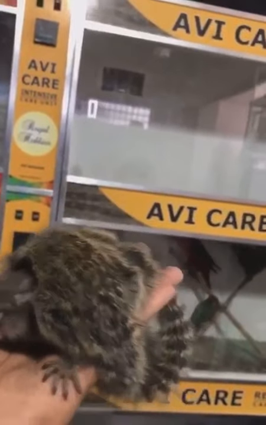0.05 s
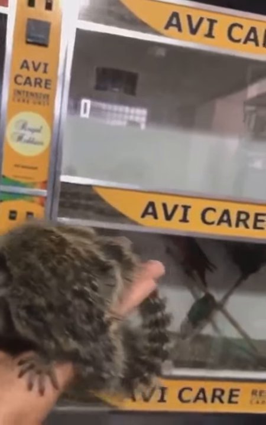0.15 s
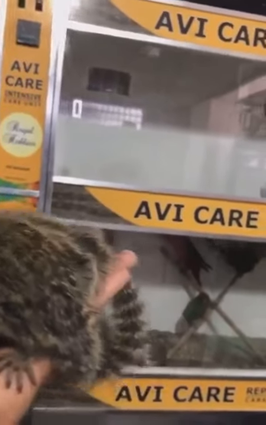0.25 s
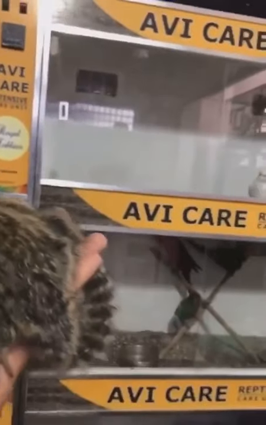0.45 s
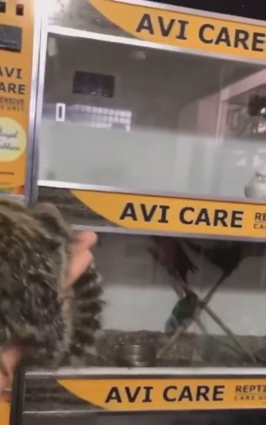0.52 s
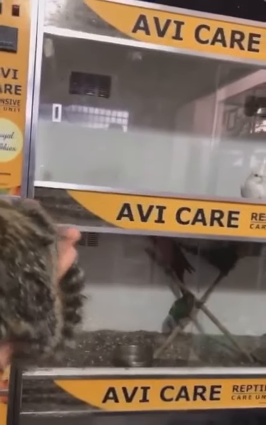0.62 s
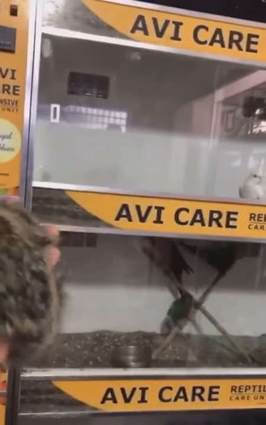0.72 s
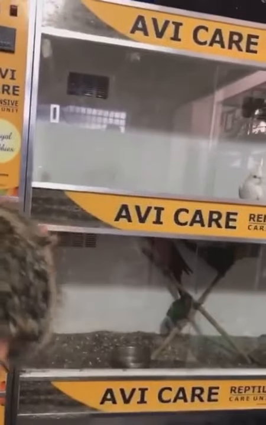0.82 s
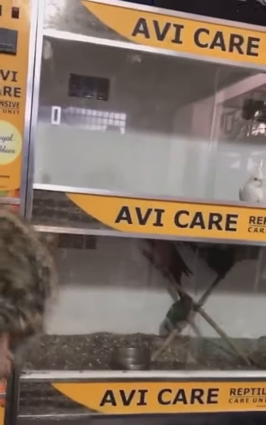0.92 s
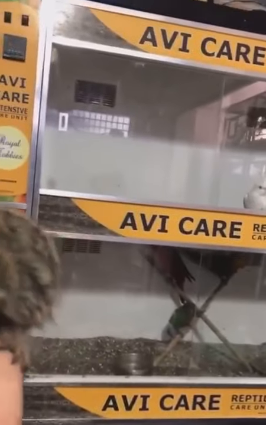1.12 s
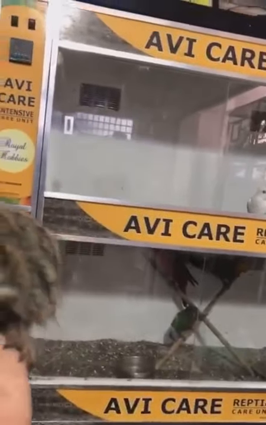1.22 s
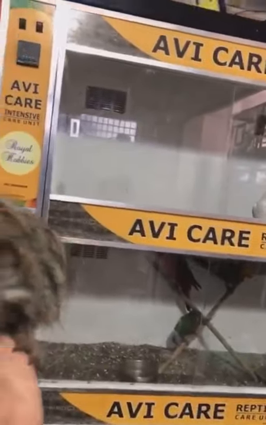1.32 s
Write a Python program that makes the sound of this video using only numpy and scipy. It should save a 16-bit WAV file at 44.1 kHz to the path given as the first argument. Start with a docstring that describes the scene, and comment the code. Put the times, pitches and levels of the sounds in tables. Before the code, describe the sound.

A nearby parrot gives a shrill screech, then a hoarse squawk that drops into a clearer note. Other caged birds add short, quieter raspy chirps before and after, over a steady low hum in a small room.

```python
"""Parrots squawk in glass-fronted cages in a small room, over a steady low hum.
A near bird gives a shrill screech, then a hoarse call that drops into a clearer note; others chatter.
Each voice is a jittery tone near 2 kHz, scattered by the cage walls.
Irregular flapping of the syrinx membranes breaks its harmonics up into rasp."""
import sys
import numpy as np
from scipy import signal
from scipy.fft import rfft, irfft
from scipy.io import wavfile
from scipy.ndimage import uniform_filter1d

SR = 44100
rng = np.random.default_rng(int(sys.argv[2]) if len(sys.argv) > 2 else 0)


def generate_wav(signal):
    """Clip the signal to [-1, 1] and save it as 16-bit WAV at the path in sys.argv[1]."""
    frames = np.transpose(np.atleast_2d(signal))
    scaled = np.clip(frames, -1, 1) * 32767
    pcm = np.round(scaled).astype(np.int16)
    wavfile.write(sys.argv[1], SR, pcm)


N = 59535
T = np.arange(N) / SR

# near bird's calls: t/s, pitch/Hz, level/dB, roughness/0-1
SCREECH = [(.325, 2000, -42, .8), (.348, 2010, -28, .5), (.368, 2080, -18.5, .16), (.392, 2090, -12, .035),
           (.409, 2095, -12, .035), (.416, 2080, -15, .07), (.425, 2075, -10.5, .03),
           (.437, 2055, -13.5, .1), (.453, 2020, -15, .33), (.461, 2000, -25, .35)]
SECOND_SIDE = [(.358, 2160, -29, .03), (.38, 2170, -18.5, .01), (.402, 2180, -13, .01),
               (.42, 2140, -26, .03)]
HOARSE = [(.605, 1885, -32, 0.89), (.66, 1961, -21, 0.83), (.68, 2015, -17, 0.44), (.705, 2068, -12, 0.16),
          (.722, 2108, -17.5, 0.52), (.762, 2093, -17, 0.84), (.785, 1910, -25, 0.62)]
CLOSING = [(.772, 1870, -26, .45), (.797, 1850, -20.5, .17), (.817, 1840, -18, .1), (.836, 1835, -23, .2),
           (.852, 1830, -35, .25)]
# harmonics 1-4: level/dB
SCREECH_HARMONICS_DB = [-11.5, 0, -2.5, -14]
SECOND_SIDE_HARMONICS_DB = [-38, 9, -26, -34]
HOARSE_HARMONICS_DB = [-11, -1.5, -2, -2.5]
CLOSING_HARMONICS_DB = [-1, -3.5, 2, -1.5]
CHATTER_HARMONICS_DB = [-3, 1, -12, -8]
# crackles: t/s, onset level/dB
CRACKLES = [(.403, -16.5), (0.424, -12), (0.7308, -21)]
# other birds' calls: t/s, length/s, level/dB, pitch/Hz, roughness/0-1, throat resonance/Hz, lift/dB
CHATTER = [(-.02, 0.018, -32, 2250, 0.34, 6570, 50), (0.129, 0.01, -27, 2554, 0.74, 5100, -8),
           (0.138, 0.019, -23.5, 2192, 0.71, 6530, 39), (0.159, .035, -34, 1863, 0.54, 1840, 1),
           (0.196, 0.015, -23.5, 2782, 0.61, 5270, -2), (0.209, .026, -25, 2262, 0.94, 6640, 21),
           (0.262, 0.019, -26.5, 2400, 0.82, 4780, 11.5), (0.277, 0.022, -28, 2300, 0.85, 6980, 21),
           (0.324, 0.043, -26, 3008, 0.73, 3030, 1), (0.462, 0.033, -30.5, 1900, 0.87, 3570, -7.5),
           (0.502, 0.014, -26, 2257, 0.76, 6700, 26), (0.553, 0.033, -29, 1809, 0.79, 6850, 14),
           (0.952, 0.039, -38, 2735, 0.8, 2700, 8), (1.01, 0.018, -31, 2202, .5, 4300, 5),
           (1.032, 0.014, -29.5, 1910, 0.6, 3850, 33), (1.024, 0.067, -30, 2540, 0.56, 4650, -17),
           (1.135, 0.031, -32, 1932, 0.2, 5500, 10)]
# noise spectra: f/Hz, relative density/dB
RASP_SPECTRUM = [(300, -15), (900, -25), (1400, -9.5), (1900, -5), (2450, -7.5), (3100, -1.5), (4200, -8),
                 (5300, 3), (6400, 1), (8000, -4.5), (10000, -8)]
VENT_SPECTRUM = [(20, -7.5), (45, -5.5), (65, -5), (110, 0.5), (180, -3.5), (300, -6), (450, -10.5),
                 (750, -15), (1100, -14), (2200, -23.5), (3500, -20), (7000, -30.5), (9000, -42)]
# background envelopes: t/s, level/dB
VENT_LEVEL = [(0, -35.5), (.9, -35.5), (1.25, -34.5), (1.35, -35.5)]
WHINE_LEVEL = [(0, -75), (.25, -39.5), (1.2, -48), (1.35, -51.5)]
DRONE_LEVEL = [(0, -50), (.97, -50), (1.05, -36), (1.21, -37), (1.3, -41)]

ATTACK_S, RELEASE_S = .0052, .017
CLEAN_JITTER, ROUGH_JITTER, JITTER_HZ = .013, .04, 420
SHIMMER_DB, SHIMMER_HZ = 4, 142
FLAP_HZ, FLAP_JITTER, FLAP_DEPTH = 518.2, .2445, .73
HALF_PITCH_DEPTH, AIR_DB = .38, -1
CRACKLE_T60_S, CRACKLE_BAND_HZ = .0085, (780, 4670)
CHATTER_SAG_HZ_PER_S, THROAT_WIDTH_HZ = 1585, 550
CAGE_T60_S, CAGE_DB = .073, -7
ROOM_T60_S, ROOM_DB = .15, -9.5
RING_HZ, RING_WIDTH_HZ, RING_T60_S, RING_DB = 3433, 360, .45, -21.5
DRONE_HZ, DRONE_JITTER, DRONE_JITTER_HZ = 65, .022, 11
PEAK_LIMIT, MIC_EDGE_HZ, MIC_LEAK_DB, HISS_DB, CUTOFF_HZ = .85, 8437, -27, -57, 11600


def near_bird():
    """Screech, hoarse call, clearer note. In the screech the two sides of the syrinx beat."""
    screech = squawk(SCREECH, SCREECH_HARMONICS_DB) + squawk(SECOND_SIDE, SECOND_SIDE_HARMONICS_DB)
    return screech + squawk(HOARSE, HOARSE_HARMONICS_DB) + squawk(CLOSING, CLOSING_HARMONICS_DB)


def squawk(curve, harmonics_db):
    """One call along a pitch, level and roughness curve."""
    pitch_hz, level_db, roughness = in_time(curve)
    return voice(pitch_hz, roughness, harmonics_db) * from_db(level_db) * gate(curve[0][0], curve[-1][0])


def voice(pitch_hz, roughness, harmonics_db):
    """Jittery harmonic tone in a cage, blended with rasp; rms 1."""
    jitter = (CLEAN_JITTER + ROUGH_JITTER * roughness) * drift(JITTER_HZ)
    phase = phase_rad(pitch_hz * (1 + jitter))
    tone = 0
    for k, level_db in enumerate(harmonics_db, 1):
        partial = cage(np.sin(k * phase))
        tone = tone + from_db(level_db + SHIMMER_DB * drift(SHIMMER_HZ)) * partial
    return evened(np.sqrt(1 - roughness) * unit_rms(tone) + np.sqrt(roughness) * rasp(tone, phase))


def rasp(tone, phase):
    """Irregularly flapping membranes modulate the tone and air noise; rms 1."""
    flap = FLAP_DEPTH * np.cos(phase_rad(FLAP_HZ * (1 + FLAP_JITTER * drift(JITTER_HZ))))
    half_pitch = HALF_PITCH_DEPTH * np.cos(phase / 2)  # strong and weak cycles alternate
    sidebands = coloured(tone * (flap + half_pitch), RASP_SPECTRUM)
    air = coloured(rng.standard_normal(N) * (1 + flap), RASP_SPECTRUM)
    return unit_rms(sidebands + from_db(AIR_DB) * air)


def crackles():
    """Brief broadband clicks during the loud calls."""
    envelope = sum((T >= t_s) * from_db(level_db - 60 * np.abs(T - t_s) / CRACKLE_T60_S)
                   for t_s, level_db in CRACKLES)
    band = signal.butter(2, CRACKLE_BAND_HZ, "band", fs=SR, output="sos")
    return envelope * unit_rms(signal.sosfilt(band, rng.standard_normal(N)))


def chatter():
    """Short raspy calls that sag in pitch, each with its own throat resonance."""
    calls = 0
    for t_s, length_s, level_db, pitch_hz, roughness, throat_hz, lift_db in CHATTER:
        sag_hz = CHATTER_SAG_HZ_PER_S * np.clip(T - t_s, 0, length_s)
        call = voice(pitch_hz - sag_hz, roughness, CHATTER_HARMONICS_DB)
        call = call + from_db(lift_db) * resonate(call, throat_hz, THROAT_WIDTH_HZ)
        calls = calls + from_db(level_db) * evened(call) * gate(t_s, t_s + length_s)
    return calls


def peep(t_s=.05, length_s=.018, pitch_hz=2656, level_db=-39):
    """One soft, nearly pure note."""
    return from_db(level_db) * voice(pitch_hz, roughness=0, harmonics_db=[0]) * gate(t_s, t_s + length_s)


def cage(x):
    """Scatter off the cage walls; rms 1."""
    return evened(x + from_db(CAGE_DB) * echo(x, reflections(CAGE_T60_S)))


def room(x):
    """Short room tail plus one lingering band."""
    ring = ring_band(reflections(RING_T60_S))
    return from_db(ROOM_DB) * echo(x, reflections(ROOM_T60_S)) + from_db(RING_DB) * echo(x, ring)


def ring_band(x):
    """The room's ringing band: two equal resonances in series."""
    return resonate(resonate(x, RING_HZ, RING_WIDTH_HZ), RING_HZ, RING_WIDTH_HZ)


def hum():
    """Ventilation noise, a narrow hiss, and a low drone that swells near the end."""
    vent = gain(VENT_LEVEL) * coloured(rng.standard_normal(N), VENT_SPECTRUM)
    whine = gain(WHINE_LEVEL) * unit_rms(ring_band(rng.standard_normal(N)))
    drone_hz = DRONE_HZ * (1 + DRONE_JITTER * drift(DRONE_JITTER_HZ))
    drone = gain(DRONE_LEVEL) * unit_rms(np.sin(phase_rad(drone_hz)))
    return vent + whine + drone


def from_db(db):
    return 10 ** (np.asarray(db) / 20)


def unit_rms(x):
    return x / np.sqrt(np.mean(x ** 2) + 1e-20)


def phase_rad(f_hz):
    return 2 * np.pi * np.cumsum(f_hz) / SR


def in_time(rows):
    """Curve columns at every sample."""
    t_s, *columns = np.transpose(rows)
    return [np.interp(T, t_s, column) for column in columns]


def gain(levels):
    """Level curve as amplitude per sample."""
    return from_db(in_time(levels)[0])


def gate(start_s, end_s):
    """Linear attack, hold, exponential release."""
    return np.clip((T - start_s) / ATTACK_S, 0, 1) * np.exp(-np.maximum(T - end_s, 0) / RELEASE_S)


def evened(x, window_samples=600):
    """Steadies the level, keeps fast flutter."""
    return x / np.sqrt(uniform_filter1d(x * x, window_samples) + 1e-12)


def drift(cutoff_hz):
    """Low-passed noise; rms 1."""
    lowpass = signal.butter(2, cutoff_hz, fs=SR, output="sos")
    return unit_rms(signal.sosfilt(lowpass, rng.standard_normal(2 * N))[N:])


def coloured(x, spectrum):
    """Filters x by a spectrum; rms 1."""
    f_hz, level_db = np.transpose(spectrum)
    bins_hz = np.maximum(np.arange(N // 2 + 1) * SR / N, 1)
    bins_db = np.interp(np.log(bins_hz), np.log(f_hz), level_db)
    return unit_rms(irfft(rfft(x) * from_db(bins_db), N))


def resonate(x, f_hz, width_hz):
    """Two-pole resonance; peak gain 1."""
    radius = np.exp(-np.pi * width_hz / SR)
    feedback = [1, -2 * radius * np.cos(2 * np.pi * f_hz / SR), radius ** 2]
    return signal.lfilter(np.array([1, 0, -1]) * (1 - radius ** 2) / 2, feedback, x)


def reflections(t60_s):
    """Dense decaying echoes."""
    return rng.standard_normal(N) * np.exp(-np.log(1000) * T / t60_s)


def echo(x, response):
    """Convolves x with a response scaled to unit energy."""
    return signal.fftconvolve(x, response / np.linalg.norm(response))[:N]


def scene():
    """Birds, crackles, room and hum; mono."""
    direct = near_bird() + crackles() + chatter() + peep()
    return (direct + room(direct) + hum())[None]


def record(dry):
    """Rounded peaks, steep microphone treble drop, faint hiss, final low-pass."""
    rounded = dry / (1 + (dry / PEAK_LIMIT) ** 8) ** (1 / 8)
    mic_edge = signal.ellip(10, .3, 70, MIC_EDGE_HZ, fs=SR, output="sos")
    heard = signal.sosfilt(mic_edge, rounded) + from_db(MIC_LEAK_DB) * rounded
    heard = heard + from_db(HISS_DB) * rng.standard_normal(N)
    return signal.sosfilt(signal.ellip(10, .3, 80, CUTOFF_HZ, fs=SR, output="sos"), heard)


dry = scene()
out = record(dry)
generate_wav(out)
```